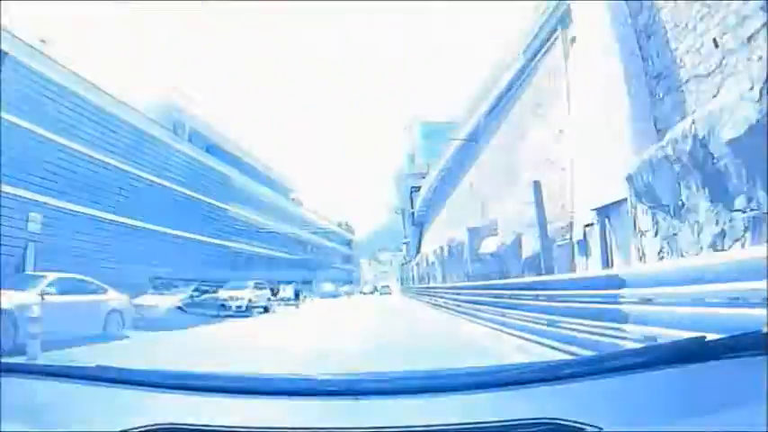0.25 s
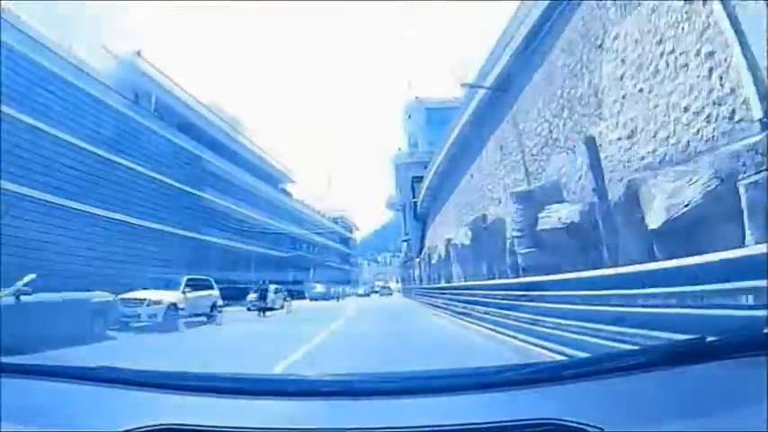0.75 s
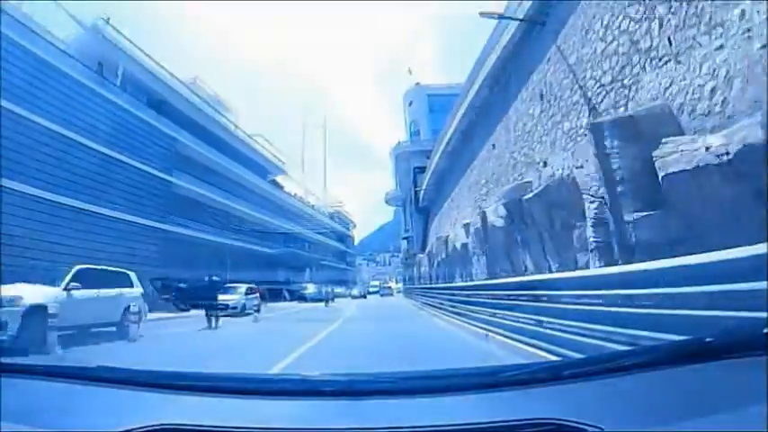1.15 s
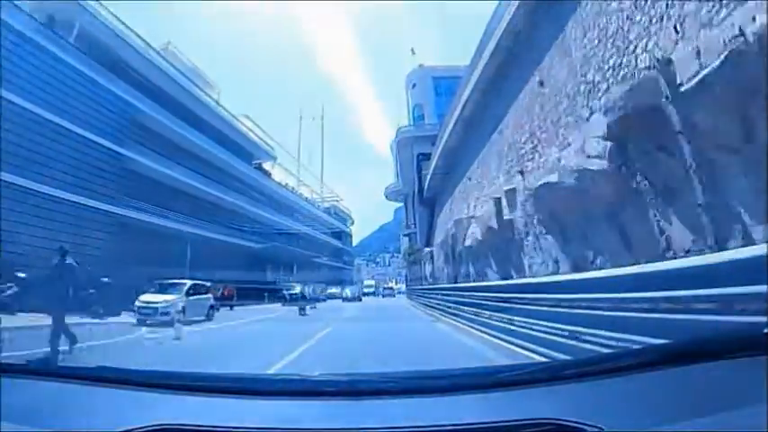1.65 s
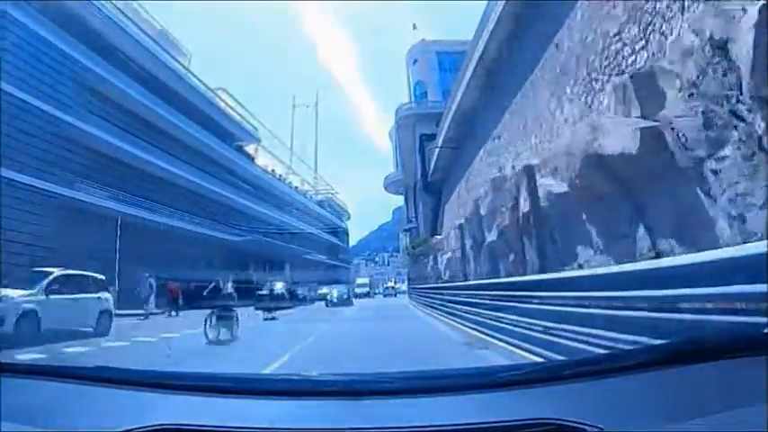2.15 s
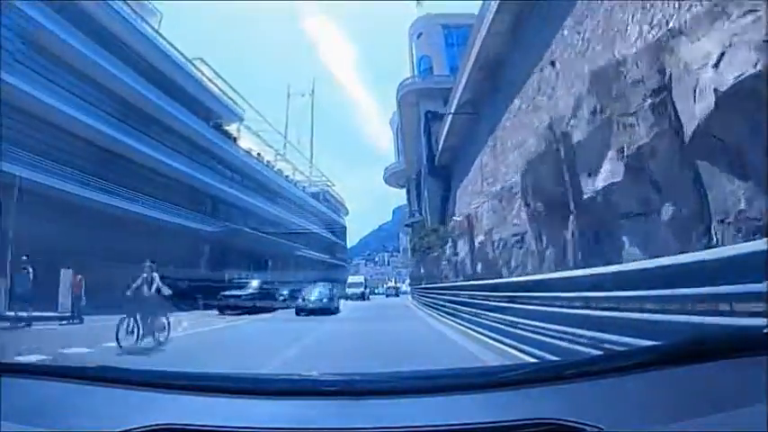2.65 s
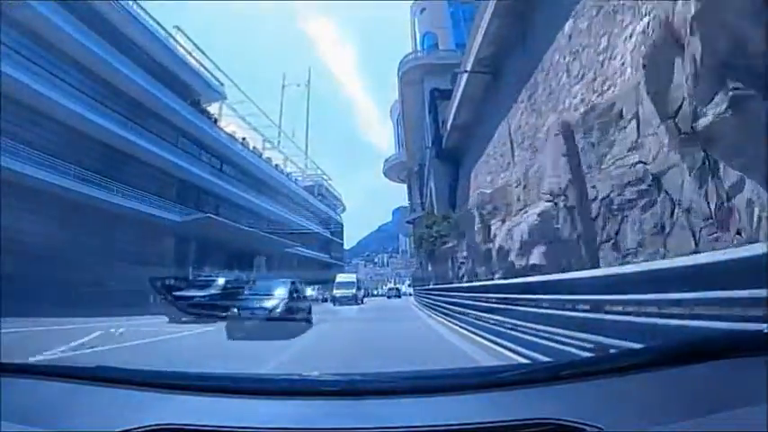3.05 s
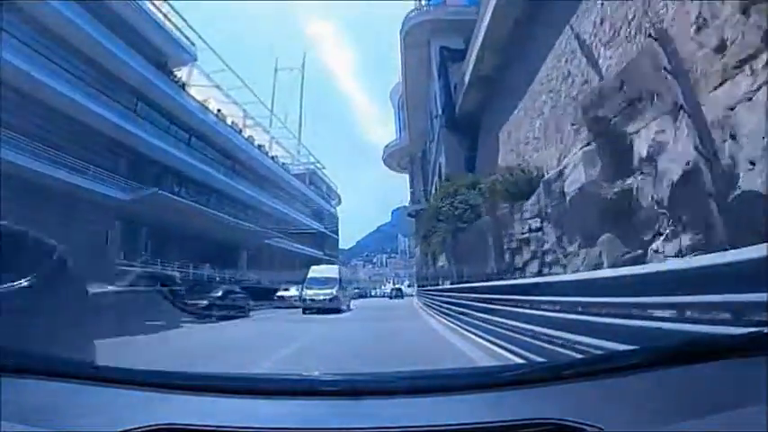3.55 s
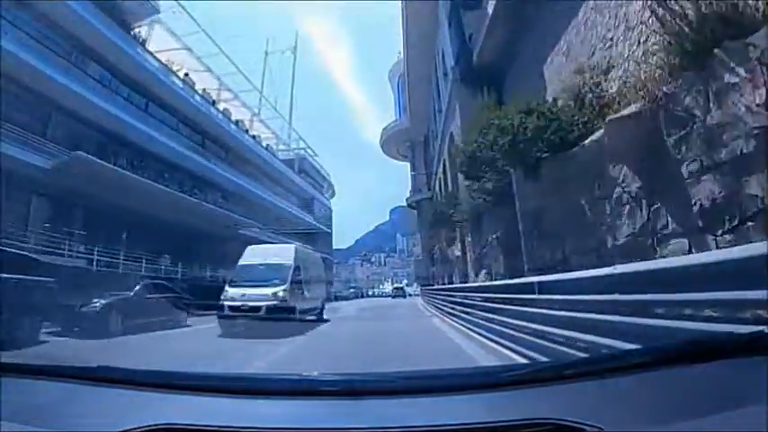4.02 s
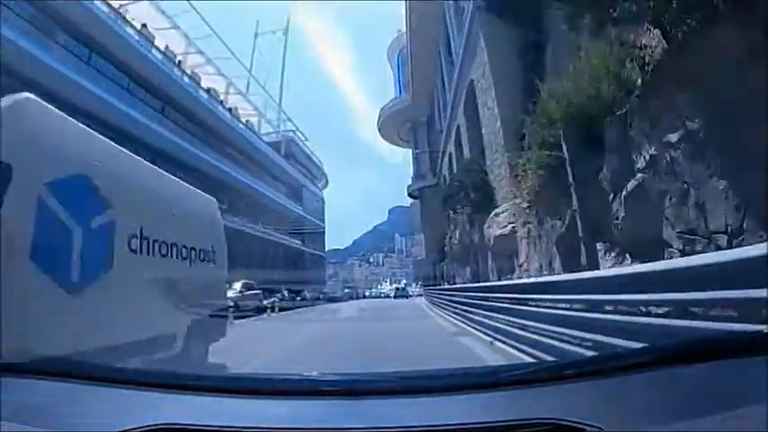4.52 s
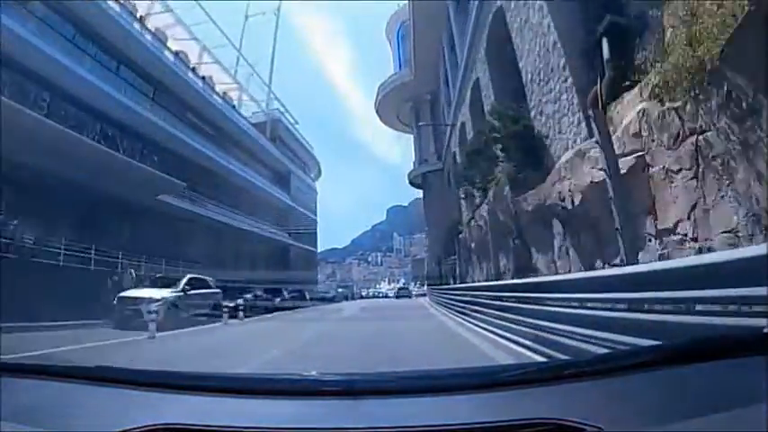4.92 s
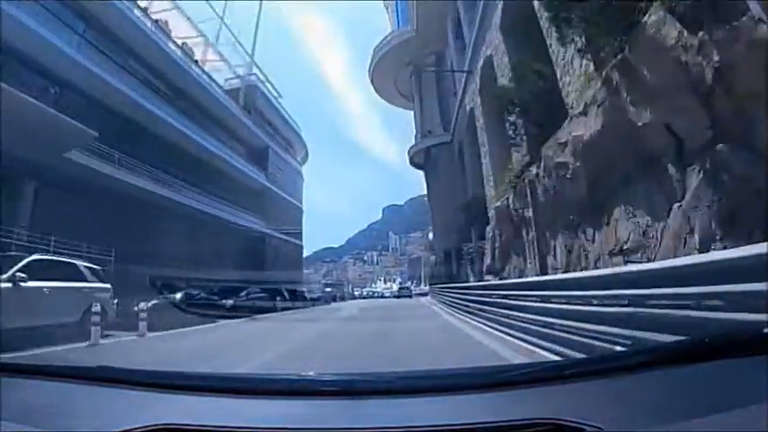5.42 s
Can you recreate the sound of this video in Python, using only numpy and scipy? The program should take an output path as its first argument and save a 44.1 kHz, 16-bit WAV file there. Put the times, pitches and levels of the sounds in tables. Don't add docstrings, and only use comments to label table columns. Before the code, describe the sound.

Inside a moving car on a walled street, heard by one dashboard camera microphone. A deep engine drone and wavering body boom dominate, over faint muffled tyre hiss. Heavy thumps and a sharp recorder click come in the first second. Three oncoming vehicles swish past, the first barely audible, the later two clearer but short. A faint click comes near the end.

```python
import sys
import numpy as np
from scipy import signal
from scipy.fft import rfft, irfft
from scipy.io import wavfile
from scipy.ndimage import uniform_filter1d

SR = 44100
rng = np.random.default_rng(int(sys.argv[2]) if len(sys.argv) > 2 else 0)


def to_wav(sig):
    pcm = np.clip(np.atleast_2d(sig), -1, 1) * 32767
    pcm = np.round(pcm).astype(np.int16)
    wavfile.write(sys.argv[1], SR, pcm.T)


def volts_from_db(level):
    exponent = np.asarray(level, float) / 20
    return 10 ** exponent


N = 250488


def unit(x):
    return x / np.sqrt(np.mean(x ** 2))


def walk(rate):
    hold = int(SR / rate)
    levels = np.repeat(rng.standard_normal(N // hold + 1), hold)
    slewed = uniform_filter1d(uniform_filter1d(levels, hold), hold)[:N]
    return unit(slewed - slewed.mean())


def swells(events, rest_db, fade_db_per_s):
    t = np.arange(N) / SR
    db = np.full(N, 1. * rest_db)
    for s, top_db in events:
        db = np.maximum(db, top_db - fade_db_per_s * np.abs(t - s))
    return volts_from_db(db)


def shape(x, points, lifts=()):
    hz = np.maximum(np.fft.rfftfreq(N, 1 / SR), 1)
    point_hz, point_db = np.transpose(points)
    db = np.interp(np.log(hz), np.log(point_hz), point_db, left=-120, right=-120)
    for center, width, lift in lifts:
        db = db + lift / (1 + (2 * (hz - center) / width) ** 2)
    return unit(irfft(rfft(x) * volts_from_db(db), N))


def evened(x, span_s, share):
    power = uniform_filter1d(x ** 2, max(int(span_s * SR), 1))
    return unit(x / power ** (share / 2))


def restless(swell_db, flicker_db, rate):
    hz = np.maximum(np.fft.rfftfreq(N, 1 / SR), 1)
    out = 0
    swell = walk(rate / 2)
    for octave in np.arange(8.5, 14.5, .5):
        bell = np.cos(np.pi * np.clip(np.log2(hz) - octave, -.5, .5))
        band = irfft(rfft(rng.standard_normal(N)) * bell, N)
        out = out + band * volts_from_db(swell_db * swell + flicker_db * walk(rate))
    return out


def engine():
    # t/s, f/Hz, level/dB
    revs = [(0.0, 64.3, -15), (0.14, 61.37, -14), (0.319, 60.74, -18.5), (1.31, 59.83, -19.5),
            (1.44, 59.97, -17), (2.04, 60.1, -16.5), (2.6, 58.74, -13), (2.96, 58.7, -17), (3.2, 58.6, -21),
            (3.67, 57.12, -14), (3.86, 57.7, -30), (3.95, 57.64, -13), (4.16, 59.5, -34),
            (4.25, 59.8, -21.5), (4.71, 61.45, -22.5), (5.25, 60.52, -23.5), (5.39, 61.1, -16),
            (5.68, 60.5, -24)]
    # multiple of the firing rate, level/dB, wander/dB
    orders = [(1, 0, .5), (2, -24, 4), (5, -26, 4)]
    # t/s, level/dB
    buzzes = [(0, -33), (.32, -32), (.8, -36), (1.46, -26), (2.04, -35.5), (2.56, -29.5), (2.96, -36.5),
              (3.34, -31), (3.95, -44), (4.2, -32.5), (4.71, -40), (5.25, -34.5), (5.68, -38.5)]
    s, *columns = np.transpose(revs)
    hz, drone_db = (np.interp(np.arange(N) / SR, s, column) for column in columns)
    phase = 2 * np.pi * np.cumsum(hz * (1 + 0.0032 * walk(8))) / SR
    drone = 0
    for multiple, order_db, wander_db in orders:
        drone = drone + volts_from_db(order_db + wander_db * walk(5.6)) * np.sin(multiple * phase)
    buzz = np.sin(3 * phase) * swells(buzzes, rest_db=-50, fade_db_per_s=72)
    return np.sqrt(2) * (drone * volts_from_db(drone_db - 1) + buzz * volts_from_db(-2.5))


def cabin():
    # f/Hz, width/Hz, level/dB
    resonances = [(124.4, 35.5, -1.5), (152.3, 30, -3), (185.7, 23.5, -2.5), (238.8, 42.4, -7.5),
                  (301.5, 52.5, -6.5), (333.5, 31.3, -4.5), (368, 37.6, -6.5)]
    hz = np.fft.rfftfreq(N, 1 / SR)
    rings = 0
    for center, width, db in resonances:
        gain = volts_from_db(db + .6 * walk(4))
        response = 1 / (1 + (2 * (hz - center) / width) ** 2)
        rings = rings + gain * irfft(rfft(rng.standard_normal(N)) * response, N)
    return unit(rings)


def road():
    # f/Hz, level/dB per Hz
    boom_color = [(8, -19), (16, -4), (24, 4.5), (32, -6.5), (42, -8), (55, -23)]
    # f/Hz, level/dB per Hz
    shake_color = [(32, -18.5), (45, -1.5), (52, -4), (60, -6.5), (68, -1), (75, -3.5), (88, -15),
                   (100, -14.5), (112, -28)]
    # f/Hz, level/dB per Hz
    hiss_color = [(240, -31), (400, -2.5), (500, -4), (589, -2), (663, -4.5), (781, -4), (1040, -6.5),
                  (1620, -15), (1990, -15.5), (4190, -28), (4860, -32.5), (6440, -32.5), (7050, -34.5),
                  (12400, -48), (14000, -50)]
    # f/Hz, width/Hz, lift/dB
    case = [(692, 15, -2.5), (894, 190, 2), (1006, 30, -5.5), (1034, 65, 5.5), (1460, 12, 2.5),
            (1560, 51, 1), (1800, 54, -6), (2070, 200, 0.5), (2660, 46, 2), (3140, 20, -5),
            (4270, 500, 1.5), (6480, 230, 6), (10200, 400, -6), (11400, 1200, 2)]
    # t/s, level/dB
    heaves = [(.12, -18), (.48, -12.5), (.76, -16), (1.16, -21), (1.32, -26.5), (1.6, -22.5), (1.85, -22),
              (2.11, -18.5), (2.32, -20), (2.55, -19.5), (2.78, -16), (2.96, -18), (3.28, -20.5),
              (3.48, -19), (3.65, -18), (3.93, -16.5), (4.18, -20), (4.4, -21), (4.6, -20.5), (4.8, -20),
              (5.08, -16), (5.3, -16.5), (5.53, -18.5), (5.68, -19)]
    # t/s, level/dB
    patches = [(0, -31.5), (.48, -22.5), (.65, -23), (1.16, -30), (1.41, -29.5), (1.7, -31), (2.0, -27),
               (2.29, -30.5), (2.6, -26.5), (2.96, -27), (3.28, -28.5), (3.65, -28), (4.28, -23),
               (4.71, -27.5), (5.08, -24.5), (5.3, -24), (5.5, -27.5)]
    # start t/s, end t/s
    stretch_s = [
        (-1, .648),
        (.648, 3.4),
        (3.4, 4.9),
        (4.9, 5.45),
        (5.45, 5.68),
    ]
    # first level/dB, last level/dB
    stretch_db = [
        (-41, -40),
        (-45.5, -38),
        (-38.5, -37),
        (-36, -38.5),
        (-43.5, -42.5),
    ]
    t = np.arange(N) / SR
    hiss_db = np.zeros(N)
    for (start, end), ends_db in zip(stretch_s, stretch_db):
        hiss_db = np.where(t >= start, np.interp(t, [start, end], ends_db), hiss_db)

    boom = evened(shape(rng.standard_normal(N), boom_color), span_s=0.065, share=0.73)
    shake = evened(shape(rng.standard_normal(N), shake_color), span_s=.12, share=0.49)
    hiss = shape(restless(swell_db=-0.62, flicker_db=0.57, rate=12), hiss_color, case)
    rumble = cabin()

    rumble_db = np.minimum(-33 + 0.68 * (hiss_db + 40.5), -32) + 0.85 * walk(6.034)
    out = boom * volts_from_db(1.7) * swells(heaves, rest_db=-39, fade_db_per_s=90)
    out = out + rumble * volts_from_db(rumble_db + 4)
    out = out + shake * volts_from_db(5.5) * swells(patches, rest_db=-44, fade_db_per_s=58)
    return out + hiss * volts_from_db(hiss_db + 1.68)


def bumps():
    # t/s, level/dB, f/Hz, t60/s
    joints = [
        (.437, -9, 62, .12),
        (.474, -8, 30, .2),
        (.46, -16, 110, .12),
        (.697, .8, 57, .16),
        (.752, -8, 40, .15),
        (.741, -21, 660, .015),
        (2.32, -30, 700, .03),
        (4.72, -20, 128, .15),
    ]
    out = np.zeros(N)
    for s, db, hz, t60 in joints:
        age = np.maximum(np.arange(N) / SR - s, 0)
        onset = 1 - np.exp(-age * hz * 2)
        decay = np.exp(-np.log(1000) * age / t60)
        out += volts_from_db(db) * onset * decay * np.sin(2 * np.pi * hz * age)
    return out


def abreast(s, approach_s, leave_s):
    age = np.arange(N) / SR - s
    return (1 + (age / np.where(age < 0, approach_s, leave_s)) ** 2) ** -1.19


def passers():
    # front axle abreast t/s, rear axle later by t/s
    abreast_s = [
        (1.385, .04),
        (3.73, .087),
        (4.74, .055),
    ]
    # level/dB, rear axle level/dB, approach/s, leave/s
    vehicles = [
        (-56, -4, .008, .04),
        (-42, 2, .022, 0.038),
        (-41.5, -2.5, 0.039, 0.082),
    ]
    # f/Hz, width/Hz, lift/dB
    voices = [
        [(4100, 500, 7.5), (5500, 1500, 4)],
        [(1050, 80, 6), (1570, 130, 9.5), (2300, 560, 8.5), (4270, 300, 6), (6300, 730, 10.5)],
        [(1549.5, 149, 6.5), (4000, 990, 2.5), (5330, 640, -2), (10000, 3500, 7)],
    ]
    # f/Hz, level/dB per Hz
    swish_color = [(500, -23.5), (900, -22), (1500, -6.5), (2500, -6.5), (4000, -10.5), (6000, -16.5),
                   (8000, -26), (11000, -40), (14500, -54)]
    # start t/s, end t/s, f/Hz, width/Hz, level/dB
    belt = (3.95, 4.22, 3310, 100, -58)
    t = np.arange(N) / SR
    air = restless(swell_db=-0.55, flicker_db=1.0, rate=25)
    out = 0
    for (s, rear_s), (db, rear_db, approach_s, leave_s), voice in zip(abreast_s, vehicles, voices):
        front = abreast(s, approach_s, leave_s)
        rear = volts_from_db(2 * rear_db) * abreast(s + rear_s, approach_s, leave_s)
        out = out + volts_from_db(db) * np.sqrt(front + rear) * shape(air, swish_color, voice)

    start, end, hz, width, db = belt
    band = [(hz - width, -20), (hz, 0), (hz + width, -20)]
    whine = evened(shape(rng.standard_normal(N), band), span_s=.02, share=.7)
    passing = np.sin(np.pi * np.clip((t - start) / (end - start), 0, 1))
    return out + volts_from_db(db) * whine * passing


def scene():
    fade_in = np.minimum(np.arange(N) / SR / .004, 1)
    return ((engine() + road() + passers() + bumps()) * fade_in)[None]


def thin_treble(x, from_hz, top_hz, wander_hz, share, hole_db, coarse):
    hz, t, z = signal.stft(x, SR, nperseg=2048)
    chance = rng.random((len(hz) // 8 + 1, len(t) // 2 + 1))
    chance = np.kron(chance, np.ones((8, 2)))[:len(hz), :len(t)]
    thrift = np.clip((hz[:, None] - from_hz) / 3000, 0, 1)
    holes = volts_from_db(hole_db * np.clip((share * thrift - chance) / .05, 0, 1))
    nearby = uniform_filter1d(np.abs(z), size=16, axis=1)
    weak = np.abs(z) < coarse * thrift * nearby
    steps = np.round(walk(15)[np.minimum(t * SR, N - 1).astype(int)])
    below_edge = hz[:, None] < top_hz + wander_hz * steps
    return signal.istft(z * holes * ~weak * below_edge, SR, nperseg=2048)[1][..., :N]


def clicks():
    # t/s, step level/dB
    jumps = [
        (.6481, -16),
        (5.4495, -34),
    ]
    t = np.arange(N) / SR
    steps = 0
    for s, db in jumps:
        steps = steps + volts_from_db(db) * (t >= s) * np.exp(-np.maximum(t - s, 0) / 0.0024)
    return uniform_filter1d(steps, size=4)


def top_cut(x):
    return signal.sosfilt(signal.butter(12, 14110, fs=SR, output="sos"), x)


def record(dry):
    thinned = thin_treble(dry, from_hz=6000, top_hz=13900, wander_hz=350, share=.15, hole_db=-17.5, coarse=0.81)
    return top_cut(thinned + clicks())


dry = scene()
out = record(dry)
to_wav(out)
```